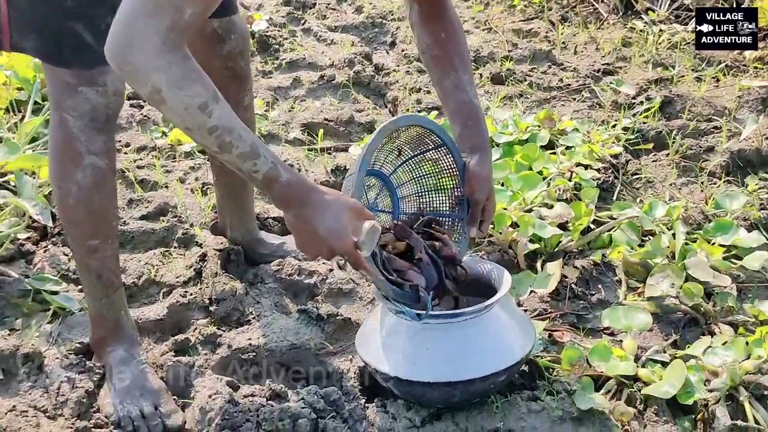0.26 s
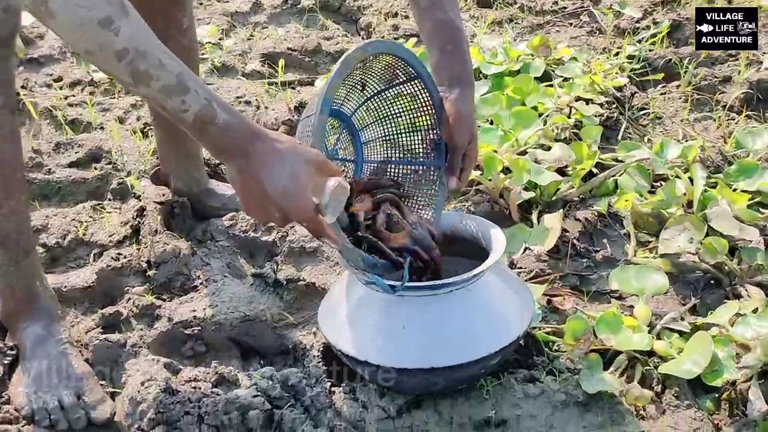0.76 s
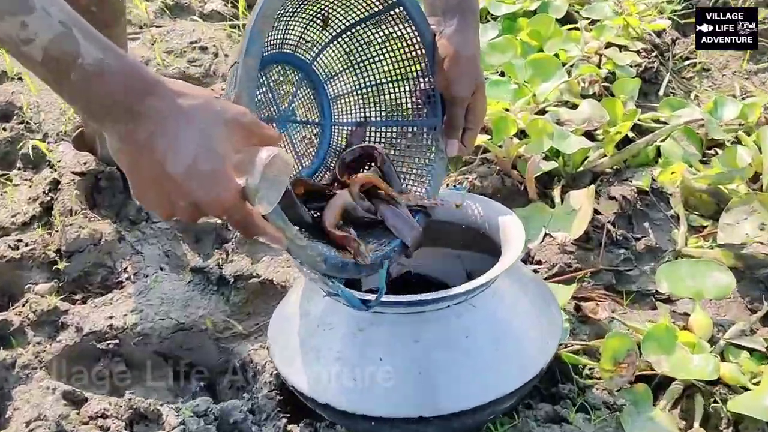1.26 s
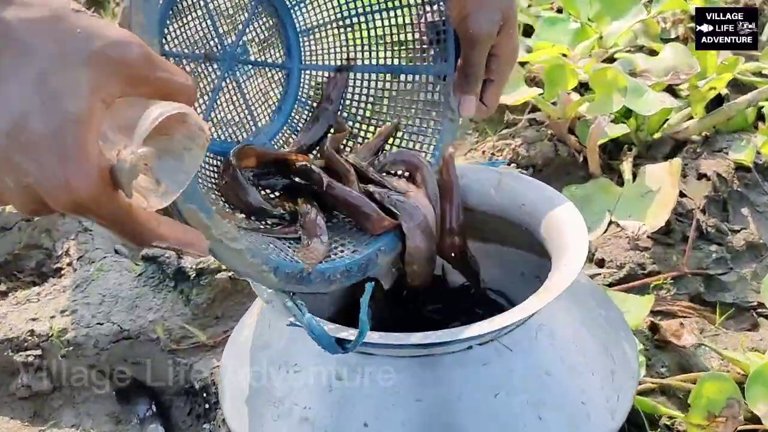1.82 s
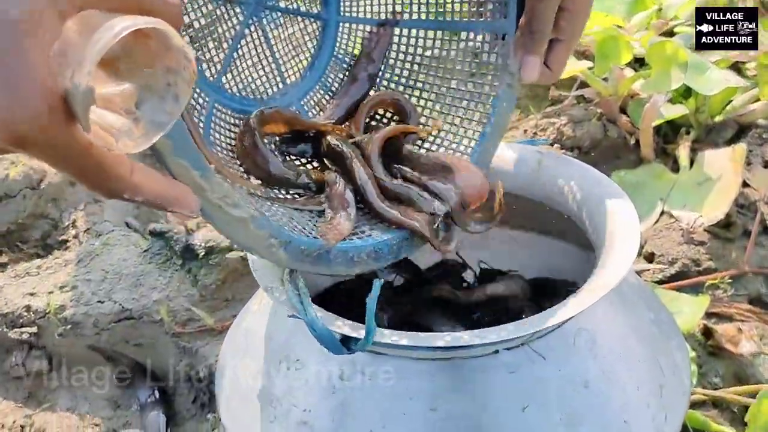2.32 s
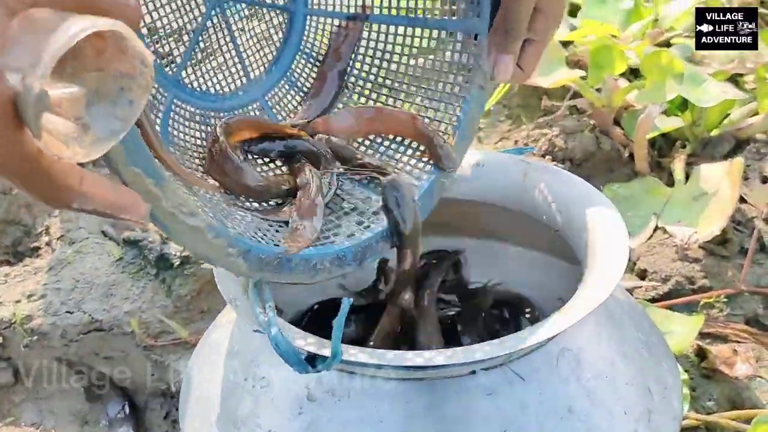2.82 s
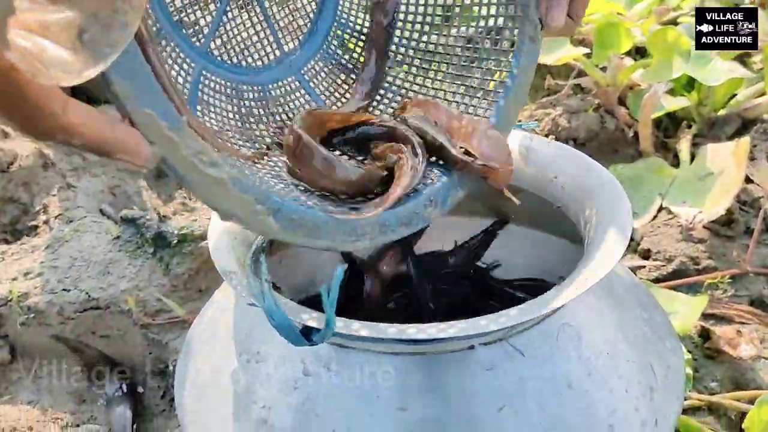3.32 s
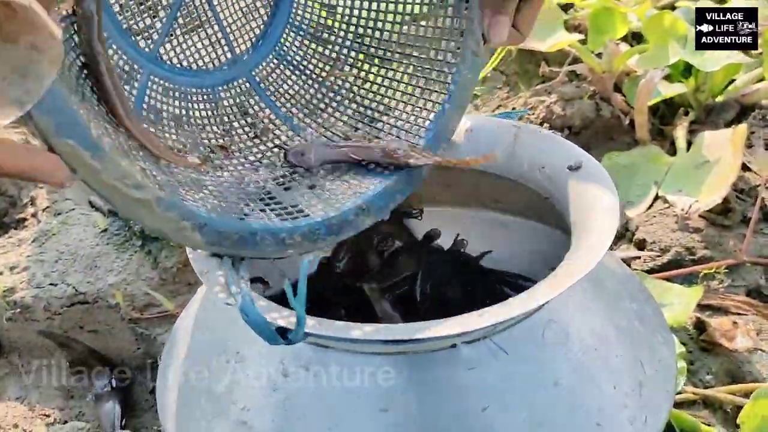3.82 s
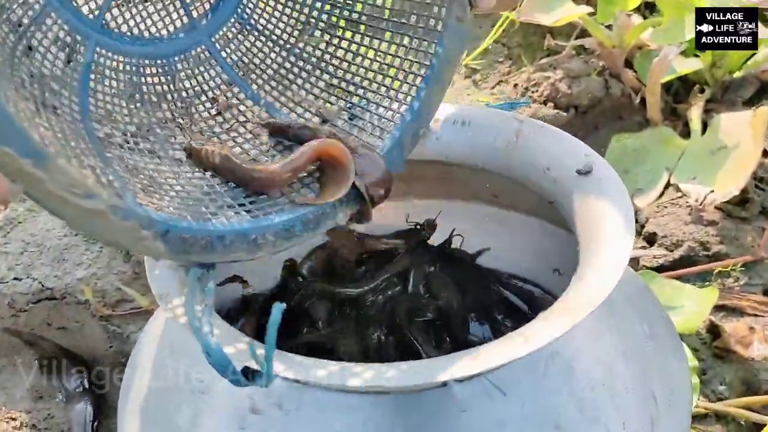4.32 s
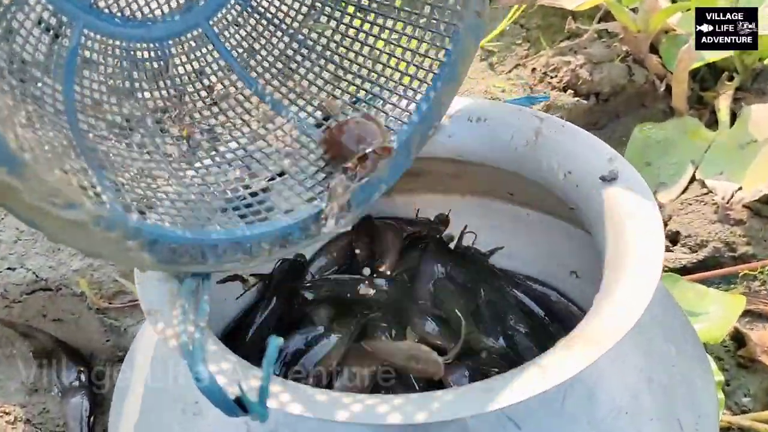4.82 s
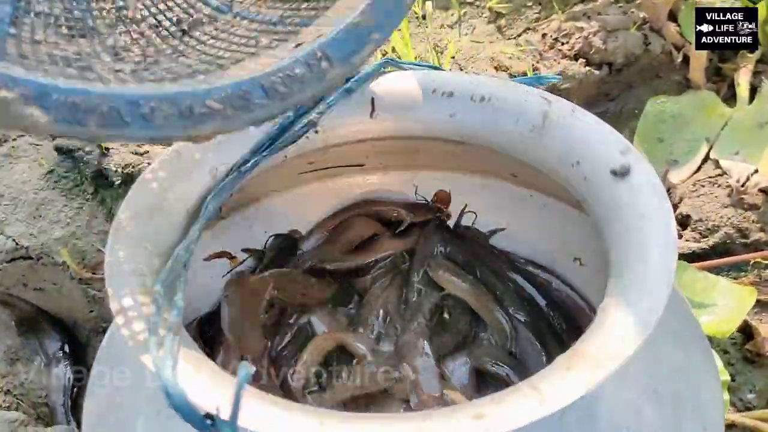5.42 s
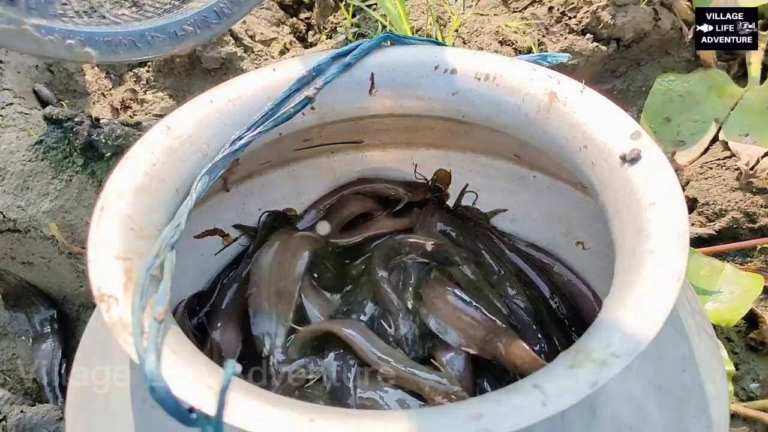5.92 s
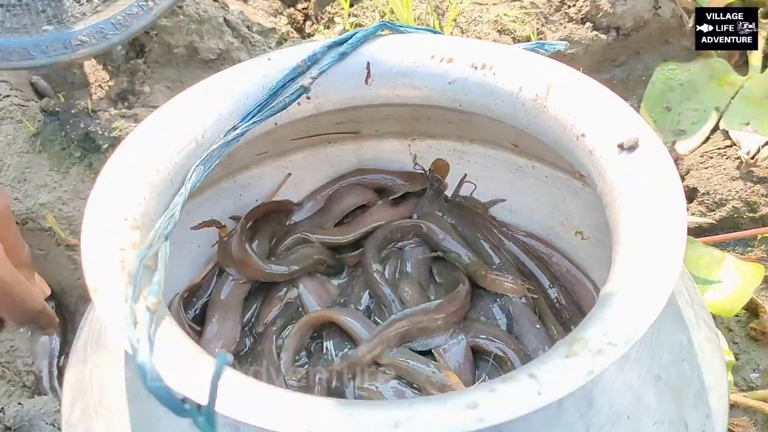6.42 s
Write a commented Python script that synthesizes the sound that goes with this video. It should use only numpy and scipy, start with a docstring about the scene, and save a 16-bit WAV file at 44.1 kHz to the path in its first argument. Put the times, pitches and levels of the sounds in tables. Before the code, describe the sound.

Small live fish slide out of a plastic mesh basket into an aluminium pot with a little water, heard close up outdoors. From the start there is a soft, slimy crackle and slither, dotted with irregular wet smacks and clicks. The wriggling swells from about 0.7 to 1.5 seconds, then turns busier between 2 and 3 seconds with sharper slaps, squelches, small slurps and dull flops that make the pot ring faintly. Light wind rumbles on the microphone at the start and buffets it briefly just before 3 seconds. A sharp smack comes near 4 seconds, and a dense wet flurry from 4.5 to 5 seconds. Afterwards the heap settles into scattered flicks, with one last short squirm around 6.2 seconds. A distant pump engine chugs low and steady throughout, and a far bird gives one faint, thin note at about 5.8 seconds.

```python
"""Small catfish slide out of a plastic basket into an aluminium pot with a little water, close-miked.
Slimy bodies crackle over the mesh, then smack, squelch and flop on the heap; the pot rings faintly.
Far across the field a one-cylinder pump engine chugs and a bird gives one thin note.
A light wind brushes the two ports of the stereo microphone."""
import sys
import numpy as np
from scipy import signal
from scipy.fft import rfft, irfft
from scipy.io import wavfile
from scipy.ndimage import uniform_filter1d

SR = 44100
rng = np.random.default_rng(int(sys.argv[2]) if len(sys.argv) > 2 else 0)


def to_wav(sig):
    """Store sig (one row per channel, or 1-D mono) as 16-bit WAV at the path in sys.argv[1].

    Samples outside -1..1 are clipped; the rate is SR.
    """
    pcm = np.clip(np.atleast_2d(sig), -1, 1) * 32767
    pcm = np.round(pcm).astype(np.int16)
    wavfile.write(sys.argv[1], SR, pcm.T)  # frames by channels


N = 293573
TIME = np.arange(N) / SR
EVENT_GAIN = np.sqrt(SR / 50)  # brings a unit-energy event to rms 1 over 20 ms

# smacks and flicks of wet skin: t/s, relative level/dB, f/Hz, decay/s, left minus right/dB
SMACKS = [(0.076, -35.5, 5460, 0.0049, 1), (0.618, -54, 7460, .004, -4), (0.978, -45.5, 6550, .004, 2),
          (1.054, -44, 5400, .001, 7), (1.086, -40, 4100, 0.00081, 7), (1.099, -37, 4970, 0.0022, -1),
          (1.226, -37, 7000, 0.0081, 5.5), (1.454, -36.5, 5550, 0.0032, -2), (1.828, -45, 7050, .003, 14),
          (2.015, -42.5, 5200, 0.0036, 1), (2.062, -45, 6340, 0.0055, -2), (2.076, -44, 5240, .001, -1),
          (2.198, -32.5, 11300, 0.0028, 5), (2.293, -28, 5530, 0.0052, -2.5),
          (2.411, -32, 9300, 0.0094, 7.5), (2.493, -45.5, 6400, 0.003, -11), (2.505, -37, 6320, 0.011, -2),
          (2.548, -33.5, 5140, 0.0063, 5), (2.559, -27.5, 12800, .002, 8), (2.7, -36, 9100, 0.0081, 6.5),
          (2.819, -38, 5600, 0.0091, 14), (2.884, -39, 6570, 0.0029, 13), (2.911, -32.5, 10000, 0.0026, 0),
          (2.986, -42, 4900, 0.0034, 7), (3.261, -46, 7830, .003, -2), (3.38, -35.5, 6720, 0.0097, 15),
          (3.45, -42.5, 5200, 0.0065, 7), (3.498, -36, 6750, 0.0033, -4), (3.66, -40, 4360, 0.0068, 5),
          (3.789, -33, 5450, 0.012, 10), (3.818, -43.5, 5400, 0.0036, 12), (3.973, -25, 6010, 0.0031, 2),
          (4.083, -53, 6500, .002, -2), (4.096, -43.5, 5870, 0.0045, 3), (4.142, -38, 4880, 0.0053, 6),
          (4.327, -38.5, 7970, 0.0037, 3.5), (4.518, -41, 5800, 0.0037, 7), (4.54, -25, 6460, 0.0029, -2.5),
          (4.614, -30.5, 4700, .0035, 5.5), (4.664, -39, 5900, 0.02, 2), (4.695, -28.5, 10900, 0.0022, 0),
          (4.722, -41.5, 6500, .002, -4), (4.731, -43, 9100, 0.005, -9), (4.795, -30, 6740, 0.017, 3.5),
          (4.817, -33, 13100, 0.018, -9), (4.841, -43.5, 8550, 0.0015, -6), (4.852, -44, 5400, 0.0023, 7),
          (4.914, -38, 4270, 0.0069, 5.5), (4.978, -43, 7700, 0.0038, 7), (5.011, -41, 8740, 0.01, 5),
          (5.106, -41.5, 6900, 0.016, 13), (5.184, -39, 6400, 0.0076, 4.5),
          (5.303, -27.5, 5950, 0.0013, -8.5), (5.393, -42, 5160, 0.021, 5),
          (5.456, -35.5, 12100, 0.0029, 6), (5.487, -44.5, 9100, 0.0037, -3),
          (5.625, -40, 4770, 0.00074, -5), (5.669, -50.5, 7960, 0.0027, -7),
          (5.901, -32.5, 6480, 0.0086, 7.5), (5.952, -46.5, 6470, 0.003, -3),
          (6.191, -35, 5370, 0.0035, -9), (6.272, -44, 6430, 0.0052, -5), (6.428, -48.5, 10300, 0.0023, 3)]
# spectrum of a smack about its pitch: f/pitch, level/dB
SMACK_SHAPE = [(.03, -52), (.15, -28.5), (.4, -17), (.62, -11), (.85, -1), (1.05, -2.5), (1.5, -6),
               (2.2, -9.5), (3.4, -25)]
# spectrum of a squelch about its pitch: f/pitch, level/dB
SQUELCH_SHAPE = [(.05, -23), (.15, -5.5), (.45, -9), (.8, 2), (1.1, 1.5), (1.6, 4), (3, -18), (6, -13.5)]


def amp(db):
    """Decibels to gain."""
    return 10 ** (np.asarray(db) / 20)


def unit(x):
    """Scales to rms 1."""
    return x / np.sqrt(np.mean(x ** 2) + 1e-20)


def add(mix, s, sound):
    """Mixes a two-channel sound in at time s."""
    part = mix[:, max(round(s * SR), 0):][:, :sound.shape[1]]
    part += sound[:, :part.shape[1]]


def colour(x, points, scale=1, size=4096):
    """Causal filter with an outline (f/Hz, level/dB) whose frequencies are multiplied by scale."""
    hz, db = np.transpose(points)
    outline = np.interp(np.log(np.fft.rfftfreq(size, 1 / SR) + 1), np.log(hz * scale), db)
    cepstrum = irfft(np.log(amp(outline)))
    cepstrum[1:size // 2] *= 2  # folded for minimum phase
    cepstrum[size // 2 + 1:] = 0
    response = irfft(np.exp(rfft(cepstrum)))
    return signal.fftconvolve(x, response[None], axes=1)[:, :x.shape[1]]


def ports(three, apart):
    """One shared signal and a share of two private ones give left and right."""
    return three[0] + apart * three[1:]


def noise(outline, apart, size=4096):
    """Coloured stereo noise at rms 1."""
    return unit(colour(ports(rng.standard_normal((3, N)), apart), outline, size=size))


def pops(count, per_s, spread_db):
    """Three trains of tiny bursting films, most small and a few large."""
    size = amp(spread_db * np.minimum(rng.exponential(1, (3, count)), 4))
    return size * rng.choice([-1, 1], (3, count)) * (rng.random((3, count)) < per_s / SR)


def bubble(t, hz, cycles):
    """A trapped bubble rings for some cycles; each port hears it at its own phase."""
    age = np.maximum(t, 0) * hz / cycles
    phase = 2 * np.pi * (cycles * age + rng.normal(0, 0.16, (2, 1)))
    return np.exp(-age) * (1 - np.exp(-age * cycles)) * np.sin(phase)


def bursts(rows, shape, per_s, spread_db, snap, rise_s, apart, bubbly, cycles, count=4):
    """Each event is a snap with its wall echo, a dying cluster of pops and bubbles near its pitch."""
    wall_echo_s, wall_share, path_spread_s = .0015, 0.89, .00025
    out, t = np.zeros((2, N)), np.arange(SR // 7) / SR
    for s, db, hz, decay, *side_db in rows:
        swell = (1 - np.exp(-t / (rise_s + decay / 20))) * np.exp(-t / decay)
        cluster = ports(pops(len(t), per_s, spread_db) * swell, apart)
        cluster /= np.linalg.norm(cluster, axis=1, keepdims=True)
        from_wall = round(wall_echo_s * (1 + rng.random()) * SR)
        crack = snap * np.exp(-decay / 0.0044)  # short events snap hardest
        cluster[:, [0, from_wall]] += crack * np.array([1, wall_share])
        rings = bubble(t, hz, cycles)
        for _ in range(count):
            wait = rng.exponential(decay)
            rings += np.exp(-wait / decay / 2) * bubble(t - wait, hz * 2 ** rng.normal(0, 0.229), cycles)
        sound = unit(colour(cluster, shape, hz)) + bubbly * unit(rings)
        sound /= np.linalg.norm(sound, axis=1, keepdims=True)
        # each event has its own path to each port
        sound = np.array([np.roll(port, round(rng.uniform(0, path_spread_s) * SR)) for port in sound])
        pan = unit(amp(np.array([[1], [-1]]) * sum(side_db) / 2))
        add(out, s, amp(db) * EVENT_GAIN * pan * sound)
    return out


def crackle(outline, per_s, spread_db, clump_db, apart):
    """A stream of pops at rms 1, clumped by the twitches of the fish."""
    twitch = unit(uniform_filter1d(uniform_filter1d(rng.standard_normal(N), size=700), size=300))
    stream = ports(pops(N, per_s, spread_db), apart) * amp(clump_db * np.clip(twitch, -2, 2))
    return unit(colour(stream, outline))


def resonate(x, hz, width_hz):
    """A resonance that follows the pitch curve hz; rms 1."""
    turn = np.exp(2j * np.pi * np.cumsum(hz) / SR)
    pole = np.exp(-np.pi * width_hz / SR)
    return unit((turn * signal.lfilter([1], np.poly([pole, pole]), x / turn)).real)


def air():
    """The faint, even hiss of the open field."""
    # hiss spectrum: f/Hz, level/dB
    hiss = [(250, 4), (500, 0.5), (2000, -8.5), (4000, -20), (7000, -9.5), (9500, -13), (15000, -13.5)]
    return amp(-58.5) * noise(hiss, apart=0.79)


def bird(start_s=5.765, length_s=.07, hz=3530):
    """One thin, far-off note that sinks slightly, off to the right."""
    progress = np.linspace(0, 1, round(length_s * SR))
    arch = np.sin(np.pi * progress).clip(0) ** .5
    note = arch * np.sin(2 * np.pi * np.cumsum(hz * (1 - 0.056 * progress)) / SR)
    out = np.zeros((2, N))
    add(out, start_s, amp(-52.5) * np.array([note / 2, note]))
    return out


def wind(calm_db=-51):
    """Gusts rumble on the microphone, and a few buffets hit its left port."""
    # rumble spectrum: f/Hz, level/dB
    rumble = [(5, 4), (20, 0.5), (50, -1), (90, -12.5), (200, -23), (600, -32.5), (3000, -82)]
    # gusts: peak t/s, half width/s, level above the calm/dB
    gusts = [(.05, 0.48, 9.5), (2.85, 0.47, 15.5), (3.55, 0.32, 5.5)]
    # buffets: t/s, level/dB, f/Hz, decay/s, left minus right/dB
    hits = [(2.592, -36, 650, 0.016, 22), (2.65, -39, 390, 0.031, 22), (2.762, -31, 420, 0.014, 33),
            (2.817, -40, 129, 0.028, 10)]
    # spectrum of a buffet: f/pitch, level/dB
    shape = [(.1, 9.5), (.5, -0.5), (1.2, -6), (8, -20.5), (20, -28)]
    level_db = calm_db + sum(db * np.exp(-((TIME - s) / width) ** 2) for s, width, db in gusts)
    breeze = amp(level_db) * noise(rumble, apart=2.2, size=16384)
    return breeze + bursts(hits, shape, per_s=2000, spread_db=0.5, snap=0, rise_s=0.0019,
                           apart=0.1, bubbly=0, cycles=1)


def pump(thud_hz=129.6, thud_s=0.0054, first_beat_s=.0115):
    """A four-stroke across the field: a strong and a weak thud in turn, over their scattered echoes."""
    # engine speed: t/s, turns per second
    speeds = [(0, 12.82), (2.2, 12.82), (3.4, 12.95), (4.9, 12.96), (5.4, 12.86)]
    # spectrum of the echoes: f/Hz, level/dB
    echoes = [(20, -35), (55, -8.5), (90, 5.5), (125, 2.5), (175, -2.5), (210, -21.5), (260, -32),
              (600, -51), (3000, -73)]
    speed = np.interp(TIME, *np.transpose(speeds))
    turns = np.cumsum(speed) / SR - first_beat_s * speed[0]
    beat = np.round(turns).astype(int)
    t = (turns - beat) / speed  # time from the nearest beat
    force, pitch = rng.standard_normal((beat[-1] + 1, 2))[beat].T
    unevenness_db = np.where(beat % 2, 4.5, 3)
    size = amp(-34 + unevenness_db * force) * np.where(beat % 2, 0.86, 1)
    thuds = size * np.exp(-(t / thud_s) ** 2) * np.sin(2 * np.pi * thud_hz * (1 + .07 * pitch) * t)
    return thuds + amp(-48.5) * noise(echoes, apart=0.41)


def pot(x, echo_db=-12.5, echo_t60=0.05):
    """Adds quick reflections inside the pot, and its few damped modes."""
    # modes of the pot's air and wall: f/Hz, t60/s, relative level/dB
    modes = [(324, 0.031, 3), (532, 0.05, 1), (853.4, 0.092, 8), (898, 0.18, 10), (1164, 0.092, -1)]
    t = np.arange(SR // 4) / SR
    taps = rng.standard_normal((2, len(t))) * (rng.random((2, len(t))) < 4000 / SR)
    taps *= amp(-60 * t / echo_t60) * (t > .001)
    taps *= amp(echo_db) / np.linalg.norm(taps, axis=1, keepdims=True)
    ring = sum(amp(db - 60 * t / t60) * np.cos(2 * np.pi * hz * t) * 2 * np.log(1000) / (t60 * SR)
               for hz, t60, db in modes)
    nearness = np.interp(TIME, [1.5, 4.5], [.35, 1])  # the microphone closes in on the pot's mouth
    echoes = signal.fftconvolve(x, taps, axes=1)[:, :N]
    return x + echoes + amp(0.5) * nearness * signal.fftconvolve(x, ring[None], axes=1)[:, :N]


def effort(filled_s=1.66, emptied_s=5.18, attack_s=0.043, release_s=0.073):
    """Wriggling in dB: it grows as the pot fills, surges in bouts and settles once the basket is empty."""
    # bouts as batches slip over the basket's rim: t/s, length/s, extra effort/dB
    bouts = [(0.701, 0.82, 4.5), (2.434, 0.67, 3.5), (4.503, 0.27, 9.5), (6.23, 0.097, 11.5)]
    effort_db = -2.5 * np.maximum(filled_s - TIME, 0) - 6 * np.maximum(TIME - emptied_s, 0)
    for s, length, db in bouts:
        attack = np.clip((TIME - s) / attack_s, 0, 1)
        release = np.exp(-np.maximum(TIME - s - length, 0) / release_s)
        effort_db += db * attack * release
    return effort_db


def slime(level_db):
    """Slime crackles on the heap, wide across both ports."""
    # crackle spectrum: f/Hz, level/dB
    outline = [(500, -29), (2000, -6.5), (3500, 3), (5000, 3.5), (7300, -3), (9500, -3), (12000, 7),
               (15500, -24)]
    return amp(level_db) * crackle(outline, per_s=1100, spread_db=2.5, clump_db=6, apart=4.6)


def squishes(level_db, per_s=24):
    """Small sticky squishes all over the heap, each at its own pitch."""
    rows = []
    for at in np.flatnonzero(rng.random(N) < per_s / SR):
        db = level_db[at] + 5 * rng.uniform(-0.86, 1)
        hz = 4900 * 2 ** (.9 * rng.uniform(-1.017, 1))
        decay = .004 * 2 ** rng.uniform(-1.002, 1)
        rows.append((at / SR, db, hz, decay))
    return bursts(rows, SMACK_SHAPE, per_s=2500, spread_db=2, snap=0, rise_s=.003,
                  apart=1, bubbly=.8, cycles=12)


def slither(level_db, bubbles=5000):
    """Bodies rustle over the wet mesh, and the film of water breaks into tiny bubbles of many sizes."""
    # rustle spectrum: f/Hz, level/dB
    outline = [(150, -26.5), (450, -7.5), (850, 0.5), (1350, 1), (2200, -1), (3200, -0.5), (6000, -4),
               (15000, -8.5)]
    rustle = crackle(outline, per_s=3000, spread_db=5, clump_db=2.5, apart=1.5)
    film, t = np.zeros((2, N)), np.arange(SR // 50) / SR
    for at in rng.integers(0, N, bubbles):
        size = amp(7 * min(rng.exponential(), 4))
        hz = 1915 * 2 ** (0.63 * rng.uniform(-1.03, 1))
        add(film, at / SR, size * bubble(t, hz, cycles=2.5))
    return amp(level_db) * (rustle + amp(-6) * unit(film))


def glide_sounds():
    """Gliding resonances excited by crackling water: a fish slips off the heap and a shrinking pocket slurps,
    while the slow, faint early glides are bodies rubbing hollowly over the mesh and the basket's rim."""
    # slurps and hollow rubs: t/s, length/s, first f/Hz, last f/Hz, level/dB
    glides = [(0.767, 0.15, 2210, 2070, -52), (1.188, 0.043, 1500, 1590, -49.5),
              (1.371, 0.068, 1430, 1550, -52), (2.079, 0.19, 1330, 1350, -63),
              (2.687, 0.03, 3850, 4450, -43.5), (2.996, 0.054, 845, 1040, -43),
              (3.015, 0.039, 1790, 2070, -45.5), (3.066, 0.11, 1710, 2000, -41),
              (4.115, 0.044, 2650, 2950, -49), (4.726, 0.033, 1930, 2620, -42),
              (4.907, 0.044, 2440, 2520, -48.5), (5.897, 0.057, 3320, 3630, -51),
              (6.187, 0.037, 4900, 5030, -44)]
    out = np.zeros((2, N))
    for s, length, first_hz, last_hz, db in glides:
        progress = np.linspace(0, 1, round(length * SR))
        drive = ports(pops(SR // 2, per_s=1800, spread_db=5), apart=0.75)[:, :len(progress)]
        ring = resonate(drive, first_hz * (last_hz / first_hz) ** progress, width_hz=0.43 * first_hz)
        spatter = amp(-3.5) * unit(colour(drive, SQUELCH_SHAPE, first_hz))
        arch = np.sin(np.pi * progress).clip(0) ** .5
        add(out, s, amp(db) * arch * (ring + spatter))
    return out


def plips():
    """Each air pocket bursts with a short spray that keeps its bubble ringing."""
    # air pockets: t/s, level/dB, f/Hz, decay/s
    pockets = [(0.076, -42.5, 4300, 0.0036), (1.512, -46.5, 3350, 0.0015), (2.013, -43, 4020, 0.0043),
               (2.295, -31.5, 4370, 0.007), (3.616, -45, 1940, 0.0024), (3.974, -31, 3220, 0.0009),
               (4.096, -38, 4590, 0.0015), (4.703, -40, 1500, 0.0026), (5.009, -43, 1720, 0.0043),
               (6.191, -27.5, 4750, 0.002)]
    out, t = np.zeros((2, N)), np.arange(SR // 10) / SR
    for s, db, hz, decay in pockets:
        spray = rng.standard_normal((2, len(t))) * np.exp(-t / decay)
        ring = signal.fftconvolve(spray, bubble(t, hz, cycles=6.5), axes=1)
        add(out, s, amp(db) * EVENT_GAIN * ring / np.linalg.norm(ring, axis=1, keepdims=True))
    return out


def flops(nudge_db=-31, nudge_hz=825):
    """Bodies flop dully against basket and pot; every smack also nudges the pot."""
    # flops: t/s, level/dB, f/Hz, decay/s
    falls = [(0.134, -39.5, 705, 0.0038), (0.664, -47, 406, 0.0041), (1.173, -53, 885, 0.0022),
             (2.283, -46, 1320, 0.0023), (2.492, -37.5, 473, 0.028), (3.725, -48, 347, 0.0049),
             (4.614, -45.5, 543, 0.0069), (4.7, -46.5, 710, 0.043), (4.812, -44, 840, 0.0063),
             (5.527, -49, 610, 0.0061)]
    # spectrum of a flop: f/pitch, level/dB
    shape = [(.1, -19.5), (.45, -7), (1, -3), (1.7, -11.5), (3.5, -19.5), (10, -47)]
    nudges = [(s, db + nudge_db, nudge_hz, decay) for s, db, _, decay, _ in SMACKS]
    return bursts(list(falls) + nudges, shape, per_s=1300, spread_db=7.5, snap=0.23, rise_s=0.0015,
                  apart=0.055, bubbly=0.9, cycles=3)


def squelches(typical_decay_s=0.0092):
    """Water and air are squeezed out between bodies, alone and under every smack."""
    # lone squelches: t/s, relative level/dB, f/Hz, decay/s
    lone = [(0.907, -40.5, 2020, 0.0011), (1.098, -42.5, 2570, 0.00068), (1.174, -33.5, 2120, 0.00068),
            (1.811, -48.5, 2430, .005), (2.984, -46, 2620, 0.0094), (3.402, -40, 2400, 0.0087),
            (3.615, -42, 2800, 0.0042), (4.663, -43, 2550, 0.012), (4.714, -43, 2840, 0.0019),
            (4.83, -41.5, 2330, 0.0038), (5.303, -43, 2180, 0.0011), (5.408, -44, 2900, 0.015),
            (5.626, -44, 2530, 0.00085)]
    rows = list(lone)
    for s, db, _, decay, _ in SMACKS:
        wet_db = -13.5 + 6.5 * np.log2(decay / typical_decay_s)  # the slower the smack, the wetter
        hz = 2790 * 2 ** rng.normal(0, 0.24)
        rows.append((s, db + wet_db, hz, 0.96 * decay))
    return amp(2.5) * bursts(rows, SQUELCH_SHAPE, per_s=2000, spread_db=5, snap=0.74, rise_s=0.000076,
                             apart=0.88, bubbly=0.53, cycles=3, count=6)


def smacks():
    """Wet skin smacks and flicks with a bright snap, right by the microphone."""
    return amp(-1.04) * bursts(SMACKS, SMACK_SHAPE, per_s=3000, spread_db=5, snap=1.37, rise_s=0.0013,
                               apart=0.53, bubbly=0.45, cycles=20)


def fish():
    """All the wet sounds, heard from the pot's mouth; one effort drives the slide and the slime."""
    effort_db = effort()
    slide_db = -53.5 + 1.62 * effort_db - 2.04 * TIME  # fades as the basket empties
    slime_db = -54.5 + effort_db
    impacts = smacks() + squelches() + flops()
    return pot(impacts + slime(slime_db) + plips() + slither(slide_db) + squishes(slime_db) + glide_sounds())


def scene():
    """Fish close up, wind on the microphone, pump and bird far behind."""
    return fish() + pump() + wind() + air() + bird()


def record(dry, edge_hz=15550):
    """Each microphone port colours the treble; peaks clip at overload; the very top is cut off."""
    # left port response: f/Hz, level/dB
    left_port = [(2500, 3), (6000, 3), (7300, -8.5), (9000, 0)]
    # right port response: f/Hz, level/dB
    right_port = [(2500, 3), (4000, 4.24), (5000, 9.5), (6000, 9.25), (7300, 18.7), (9000, 7.2),
                  (11000, 1.2)]
    heard = np.vstack([colour(dry[:1], left_port), colour(dry[1:], right_port)])
    lowpass = signal.firwin(301, edge_hz, window=("kaiser", 9), fs=SR)
    return signal.oaconvolve(np.clip(heard, -.75, .75), lowpass[None], "same")


dry = scene()
out = record(dry)
to_wav(out)
```